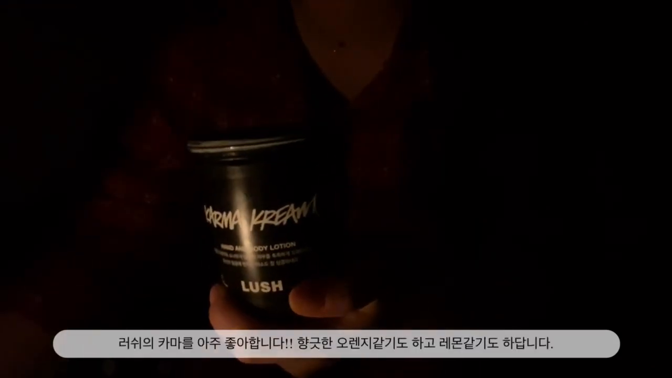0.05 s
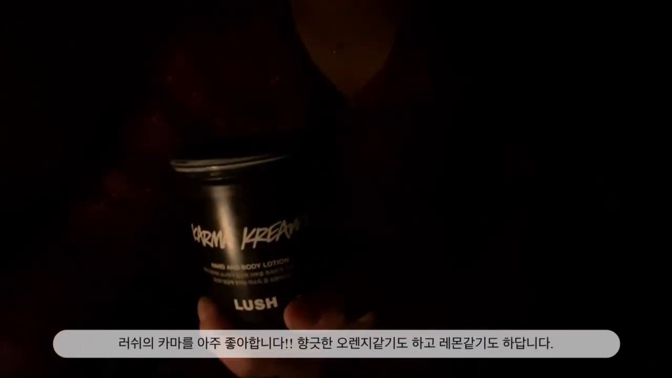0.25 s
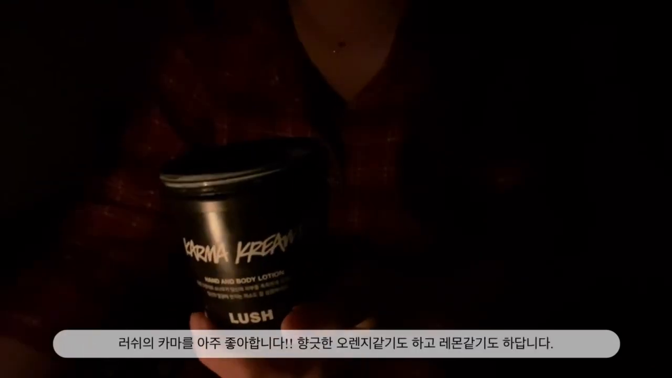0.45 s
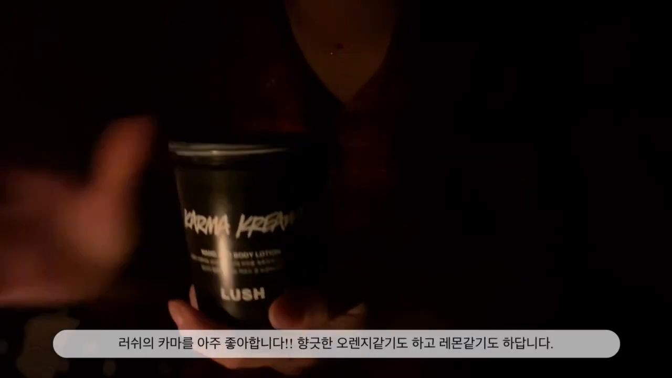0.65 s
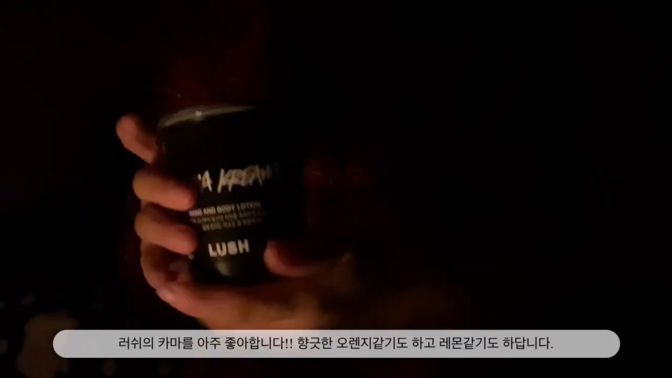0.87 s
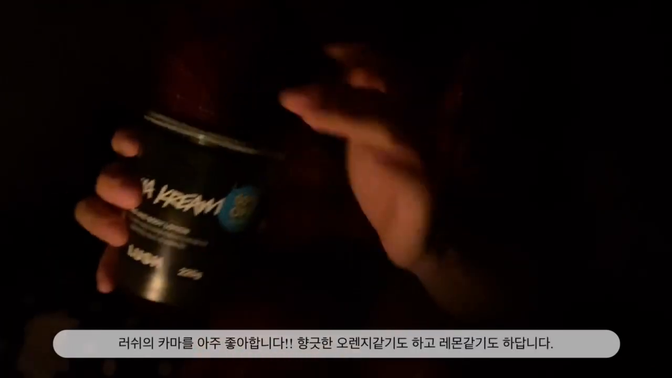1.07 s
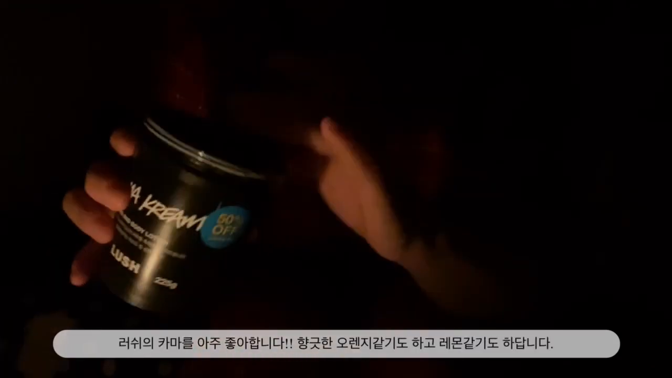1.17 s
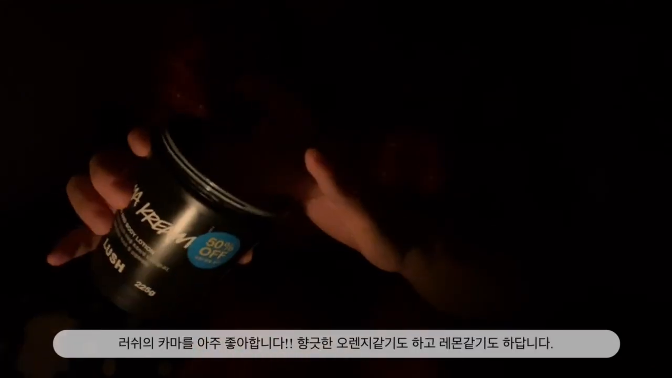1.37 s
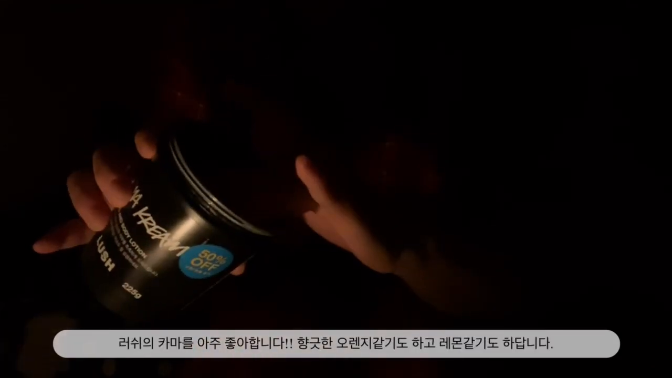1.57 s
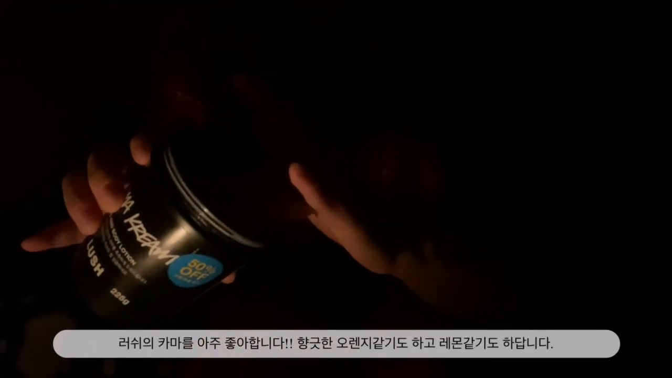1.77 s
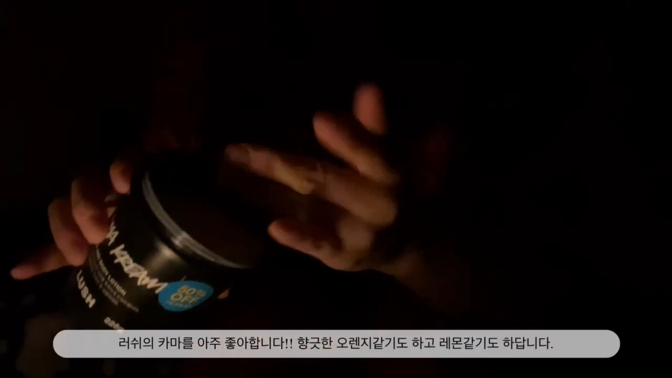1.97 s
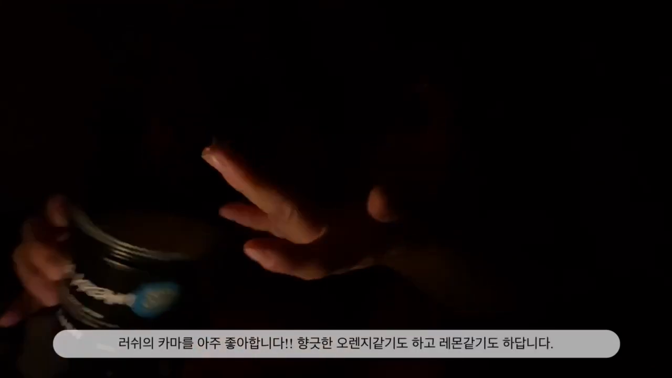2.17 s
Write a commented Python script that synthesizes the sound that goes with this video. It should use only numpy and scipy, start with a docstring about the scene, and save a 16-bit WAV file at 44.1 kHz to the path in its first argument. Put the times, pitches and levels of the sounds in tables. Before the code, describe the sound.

Close to a stereo pair of microphones in a small quiet room, a plastic lotion tub gives a dull knock, then a sharp rattling clack with soft low palm thuds, then almost nothing but low hum.

```python
"""A plastic lotion tub, handled close to a pair of microphones, knocks once, then harder, and chatters.
Each contact sums damped modes of the tub and a short noise crack, and the small quiet room answers.
Friction at the rim is shaped noise; the soft thuds in the palm are damped low sines.
Fingers tick as narrow-band bursts, and skin slides as a grainy hiss.
A low hum of wavering sines lies over rumble and air noise."""
import sys
import numpy as np
from scipy import signal
from scipy.fft import rfft, irfft, next_fast_len
from scipy.io import wavfile
from scipy.ndimage import map_coordinates

SR = 44100
rng = np.random.default_rng(int(sys.argv[2]) if len(sys.argv) > 2 else 0)


def unload_audio(sound):
    """Save the sound as a 16-bit wav file, at the path given as the first command line argument."""
    columns = np.transpose(np.atleast_2d(sound))
    # keep every value between -1 and 1, then stretch to whole-number steps
    steps = np.round(np.clip(columns, -1, 1) * 32767)
    wavfile.write(sys.argv[1], SR, steps.astype(np.int16))


N = 97020  # length [samples]

# Contacts of the tub: (time [s], level [dB], crack level [dB], place struck, low-pass corner [Hz],
# left over right [dB], lateness of the right side [ms])
CONTACTS = [(.237, -5.5, -12, "wall", 3360, 5.5, 0.37), (0.2382, -14.5, -7, "foot", 8700, -2, 0.06),
            (0.4339, 1, -7.5, "lid", 9000, 4, .2), (0.4355, -8.5, -5.5, "lid", 6980, 2.5, .05),
            (0.4381, -4.5, -12.5, "lid", 2996, 3, .65), (0.4514, -17.5, -10.5, "lid", 7000, 0, .3),
            (0.464, -8.5, -7.5, "lid", 7000, -1, .7), (.4692, -13, -16.5, "lid", 1800, -1.5, .5),
            (0.4817, -4, -8, "foot", 10020, 9, 0.3), (0.4971, -10.5, -15.5, "foot", 3500, 4.5, .25)]
# Places that can be struck, in the order of the level columns of the modes: (name, name, name)
STRUCK_PLACES = ("wall", "lid", "foot")
# Modes of the tub: (frequency [Hz], T60 [s], level struck on wall [dB], on lid [dB], on foot [dB])
TUB_MODES = [(275, 0.091, -33, -35.5, -31), (399, 0.05, -31, -42.5, -30.5),
             (683, 0.03, -16.5, -25.5, -20.5), (770, .02, -21.5, -33, -26), (880, 0.09, -32.5, -27, -31),
             (982.5, .06, -38, -23, -30.5), (1081, 0.07, -36.5, -26, -29.5), (1612, 0.021, -20, -24.5, -27),
             (1795, .02, -20.5, -27.5, -18.5), (2090, .02, -27.5, -22.5, -20),
             (2400, 0.011, -30.5, -21.5, -25.5), (2670, 0.045, -32.5, -17.5, -27),
             (3030, .01, -17, -23, -29.5), (3750, .01, -30, -19.5, -28.5), (4240, .009, -29, -16, -26.5),
             (7426, 0.016, -28, -17.5, -31), (10440, 0.01, -23.5, -21, -19)]
# Uneven radiation of the tub: (frequency [Hz], left over right [dB])
RADIATION_BALANCE = [(130, 7), (300, 4.5), (650, -0.5), (1100, -2.5), (2500, 2), (5000, -0.5), (11000, -3)]
# Spectrum shape of the crack: (frequency [Hz], level [dB])
CRACK_SPECTRUM = [(150, -8.5), (600, -16), (1300, -1), (2000, 2.5), (4500, -6.5), (6000, -6.5),
                  (12000, -5.5), (14000, -17), (16000, -24)]
# Reverberation time of the room: (frequency [Hz], T60 [s])
ROOM_DECAY = [(100, 0.31), (300, .24), (800, 0.16), (2000, 0.19), (5000, 0.19), (9000, 0.18), (15000, .18)]
# Colour of the reverberation: (frequency [Hz], level [dB])
ROOM_COLOUR = [(100, 3), (300, -4.5), (700, 0), (1300, 0), (2200, 0.5), (5000, 3), (9000, -8.5),
               (15000, -8)]
# Light ticks of the fingers on the plastic: (time [s], level [dB], centre frequency [Hz], T60 [s])
FINGER_TICKS = [(.1918, -58.5, 13600, 0.0038), (.825, -68, 1880, .03), (.9725, -70, 6000, 0.021)]
# Soft thuds of the tub in the palm: (time [s], level [dB])
PALM_THUDS = [(0.239, -51), (.447, -39.5), (0.529, -37), (0.674, -45)]
# Course of the rim scrape: (time [s], level [dB])
SCRAPE_COURSE = [(.29, -59), (.34, -67.5), (0.387, -60), (0.417, -57), (0.426, -47.5), (.432, -35.5),
                 (.438, -72.5)]
# Spectrum shape of the rim friction: (frequency [Hz], level [dB])
RIM_SPECTRUM = [(200, -17), (520, -16), (680, 0), (900, -1), (1150, -16.5), (1400, -10), (1750, -1),
                (2500, 0), (3200, -12.5), (4200, -11.5), (6000, -19.5), (12000, -27), (15000, -36)]
# Strokes of skin: (start [s], rise [s], hold [s], release [s], level [dB], tilt [dB per octave],
# left over right [dB])
SKIN_STROKES = [(.76, 0.019, 0.048, 0.092, -75, -1.5, -1), (0.783, .03, .015, 0.055, -72.5, -2, 0),
                (0.852, 0.028, .018, .024, -57, -1.5, -1), (.88, 0.013, 0.029, 0.22, -78, 1.5, 1),
                (1.851, .17, .02, .07, -79.5, 2.5, 0.5), (2.053, 0.061, .03, 0.091, -80.5, 3, 4)]
# Spectrum shape of skin friction, before the tilt: (frequency [Hz], level [dB])
SKIN_SPECTRUM = [(200, -44), (700, -7), (1150, -17), (1600, -7.5), (2400, -1.5), (3100, -5), (4500, -1),
                 (8000, -3), (11000, 2), (15000, 1.5)]
# Lines of the hum: (frequency [Hz], level [dB])
HUM_LINES = [(55, -66), (93, -69), (119.8, -67.5), (241, -88.5)]
# Spectrum shape of the rumble: (frequency [Hz], level [dB])
RUMBLE_SPECTRUM = [(18, -41), (27, -31), (34, -17), (43, -5.5), (56, 0), (76, -4), (92, -2), (110, -4),
                   (135, -14.5), (170, -25.5), (300, -39), (1000, -79)]
# Spectrum shape of the air noise: (frequency [Hz], level [dB])
AIR_SPECTRUM = [(30, -16), (150, 0), (260, 2.5), (500, -7.5), (1000, -15), (2000, -21), (4000, -23.5),
                (8000, -27.5), (12500, -31.5), (15000, -40)]

CRACK_T60_S, CONTACT_RISE_S, CRACK_ROOM_DB = 0.0074, 0.0005, 2.5
ROOM_DB, ROOM_BUILD_S = -5.5, 0.0037
THUD_HZ, THUD_T60_S, THUD_RISE_S = 84, .19, .008
SKIN_GRAIN_DB, SKIN_GRAIN_PER_S = 2.44, 270
RUMBLE_DB, AIR_DB, LOW_LEFT_DB = -66.5, -75.5, 5
LOW_CUT_HZ, TOP_HZ = 28, 15850


def amp(db):
    """Decibel law: amplitude ratio of a level."""
    return 10 ** (np.asarray(db) / 20)


def unit(x):
    """Normalisation to an rms of 1."""
    return x / np.sqrt(np.mean(x ** 2) + 1e-20)


def along(points, hz):
    """Interpolation of (frequency, value) points on a logarithmic frequency axis."""
    f, v = np.transpose(points)
    return np.interp(np.log(hz + 1), np.log(f + 1), v)


def sides(left_db):
    """Stereo level difference: half is added on the left and half taken from the right."""
    return amp(np.array([[left_db], [-left_db]]) / 2)


def wobble(rate):
    """Random modulation: a smooth curve through rate random knots a second."""
    knots = rng.standard_normal(int(N * rate / SR) + 4)
    return map_coordinates(knots, [np.arange(N) * rate / SR])


def filtered(x, response):
    """Linear filtering: the spectrum is multiplied by a complex frequency response."""
    n = x.shape[-1]
    padded = next_fast_len(n + SR // 2)
    spectrum = rfft(x, padded) * response(np.fft.rfftfreq(padded, 1 / SR))
    return irfft(spectrum, padded)[..., :n]


def noise(spectrum, alike, size=N, tilt_db=0):
    """Partial coherence: shaped stereo noise of rms 1, whose power share alike is common to both sides."""
    source = rng.standard_normal((3, size))
    share = np.clip(alike, 0, 1)
    pair = np.sqrt(share) * source[0] + np.sqrt(1 - share) * source[1:]
    return unit(filtered(pair, lambda hz: amp(along(spectrum, hz) + tilt_db * np.log2(hz + 1))))


def fade(t, t60):
    """Exponential decay: a fall of 60 dB in t60."""
    return np.exp(-np.log(1000) * t / t60)


def add(out, s, sound):
    """Superposition: a sound is mixed in at s seconds."""
    part = out[:, round(s * SR):][:, :sound.shape[-1]]
    part += sound[..., :part.shape[-1]]


def background():
    """Stationary sources: hum lines with wavering phase and level, over rumble and air noise."""
    t = np.arange(N) / SR
    hum = np.zeros(N)
    for hz, db in HUM_LINES:
        line = np.sin(2 * np.pi * hz * t + 0.36 * wobble(12))
        hum += amp(db) * unit(line * amp(0.5 * wobble(12)))
    rumble = amp(RUMBLE_DB) * noise(RUMBLE_SPECTRUM, .8)
    air = amp(AIR_DB) * noise(AIR_SPECTRUM, 0.18)
    return sides(LOW_LEFT_DB) * (hum + rumble) + air


def ticks():
    """Damped narrow-band excitation: tiny clicks of the fingers on the plastic."""
    out, t = np.zeros((2, N)), np.arange(SR // 10) / SR
    for s, db, hz, t60 in FINGER_TICKS:
        band = [(hz / 2, -22), (hz, 0), (hz * 2, -22)]
        add(out, s, amp(db) * fade(t, t60) * noise(band, .5, size=len(t)))
    return out


def room(x):
    """Diffuse reverberation: convolution with noise that builds up and decays at a rate set by frequency."""
    hz, t, z = signal.stft(rng.standard_normal((2, SR // 2)), SR, nperseg=256)
    decay = fade(t, along(ROOM_DECAY, hz)[:, None])
    tail = signal.istft(z * decay, SR, nperseg=256)[1]
    tail = tail * (1 - np.exp(-np.arange(tail.shape[1]) / SR / ROOM_BUILD_S))
    tail = filtered(tail / np.linalg.norm(tail[0]), lambda hz: amp(along(ROOM_COLOUR, hz)))
    return amp(ROOM_DB) * signal.fftconvolve(x, tail, axes=1)[:, :x.shape[1]]


def contact(db, crack_db, place, dull_hz, left_db, late_ms):
    """Modal excitation: the place struck sets the level of each damped mode; a noise crack joins them."""
    t = np.arange(SR // 2) / SR
    ring = np.zeros(len(t))
    for k, (hz, t60, *levels) in enumerate(TUB_MODES):
        level = amp(levels[STRUCK_PLACES.index(place)])
        ring += (-1) ** k * level * fade(t, t60) * np.sin(2 * np.pi * hz * t)  # alternating polarity
    crack = amp(crack_db) * fade(t, CRACK_T60_S) * noise(CRACK_SPECTRUM, .3, size=len(t))
    delay_s = np.array([[0], [late_ms / 1000]])

    def path(hz):
        """Propagation: delay of the right side, first-order low-pass and uneven radiation."""
        delayed = np.exp(-2j * np.pi * hz * delay_s)
        balance = amp(along(RADIATION_BALANCE, hz) * [[.5], [-.5]])
        return delayed / (1 + 1j * hz / dull_hz) * balance

    onset = 1 - np.exp(-t / CONTACT_RISE_S)
    ring = filtered(ring * onset, path)
    crack = filtered(crack * onset, path)
    direct = sides(left_db) * (ring + crack)
    reverberant = sides(1.5) * room(ring + amp(CRACK_ROOM_DB) * crack)
    return amp(db) * (direct + reverberant)


def knocks():
    """Repeated impact: a single knock, then a hard one that chatters in close contacts."""
    out = np.zeros((2, N))
    for s, *blow in CONTACTS:
        add(out, s, contact(*blow))
    return out


def thuds():
    """Damped oscillation: the tub pushes into the palm with a low, soft bump."""
    out, t = np.zeros((2, N)), np.arange(SR // 2) / SR
    bump = np.sin(2 * np.pi * THUD_HZ * t) * fade(t, THUD_T60_S) * (1 - np.exp(-t / THUD_RISE_S))
    for s, db in PALM_THUDS:
        add(out, s, amp(db) * sides(3.5) * bump)
    return out


def scrape():
    """Dry friction: noise at the rim, coloured by the tub, dips, grows and abruptly lets go."""
    s, db = np.transpose(SCRAPE_COURSE)
    level_db = np.interp(np.arange(N) / SR, s, db, left=-120, right=-120)
    return amp(level_db + 1.5 * wobble(270)) * noise(RIM_SPECTRUM, 0.1) * sides(10.0)


def slides():
    """Sliding friction: strokes of skin give a finely grained hiss that swells, holds and dies."""
    out, t = np.zeros((2, N)), np.arange(N) / SR
    for s, rise, hold, release, db, tilt_db, left_db in SKIN_STROKES:
        corners_s = s + np.cumsum([0, rise, hold, release])
        stroke = np.sin(np.pi / 2 * np.interp(t, corners_s, [0, 1, 1, 0])) ** 2
        grain = amp(SKIN_GRAIN_DB * wobble(SKIN_GRAIN_PER_S))
        hiss = unit(noise(SKIN_SPECTRUM, .15, tilt_db=tilt_db) * grain)
        out += amp(db) * stroke * hiss * sides(left_db)
    return out + amp(-7.5) * room(out)


def scene():
    """Superposition of the tub, the hands and the room."""
    return background() + ticks() + knocks() + thuds() + scrape() + slides()


def record(dry):
    """Band limitation: the microphones roll off the deepest bass; nothing is kept above the top."""
    low_cut = signal.butter(4, LOW_CUT_HZ, "highpass", fs=SR, output="sos")
    return filtered(signal.sosfilt(low_cut, dry), lambda hz: hz < TOP_HZ)


dry = scene()
out = record(dry)
unload_audio(out)
```